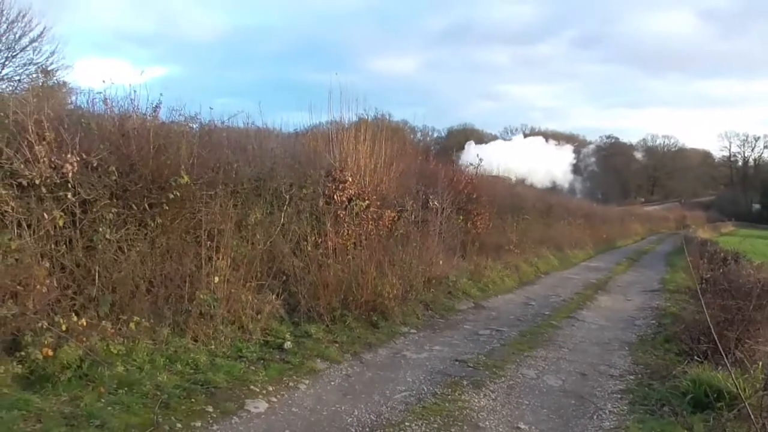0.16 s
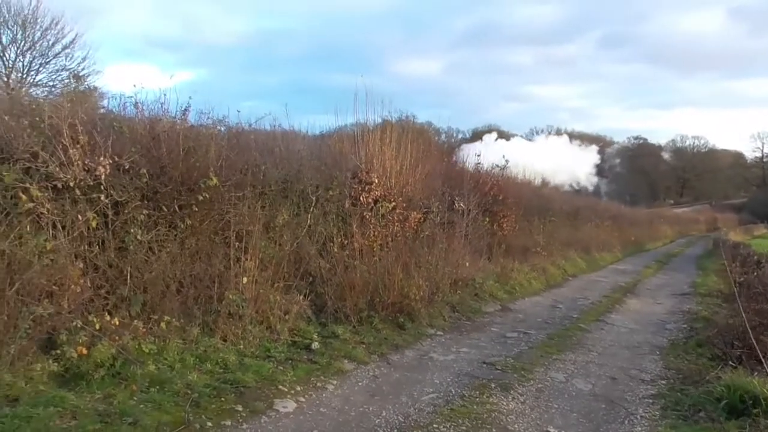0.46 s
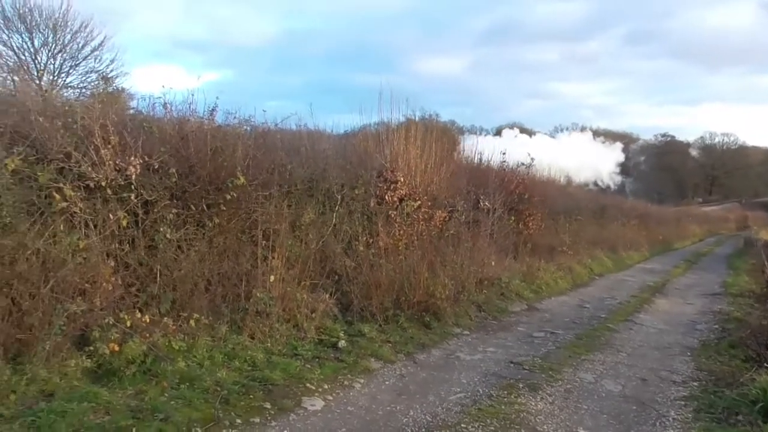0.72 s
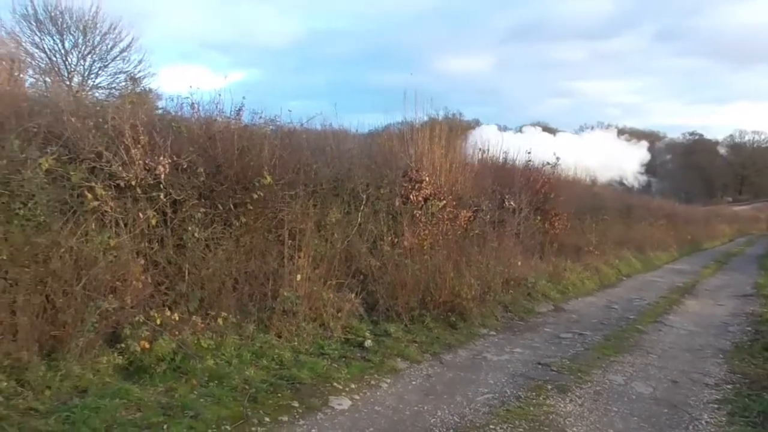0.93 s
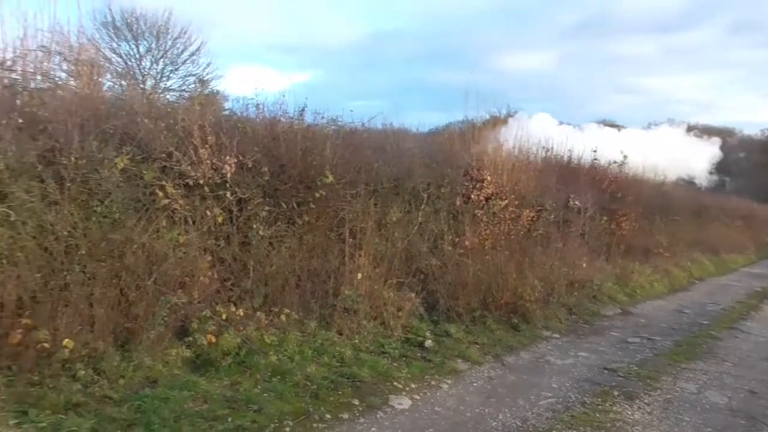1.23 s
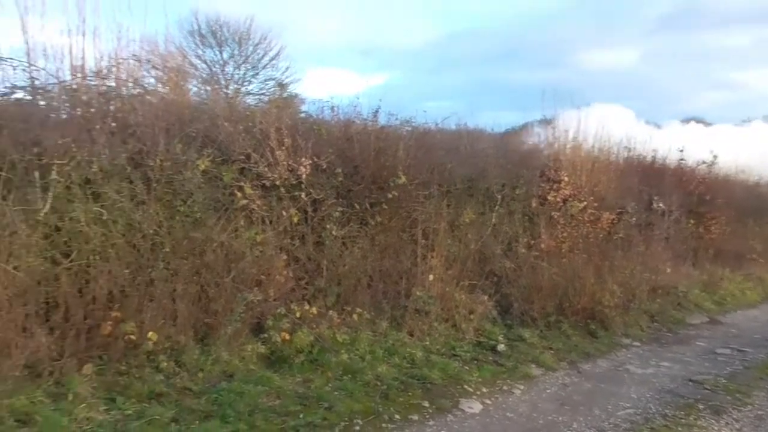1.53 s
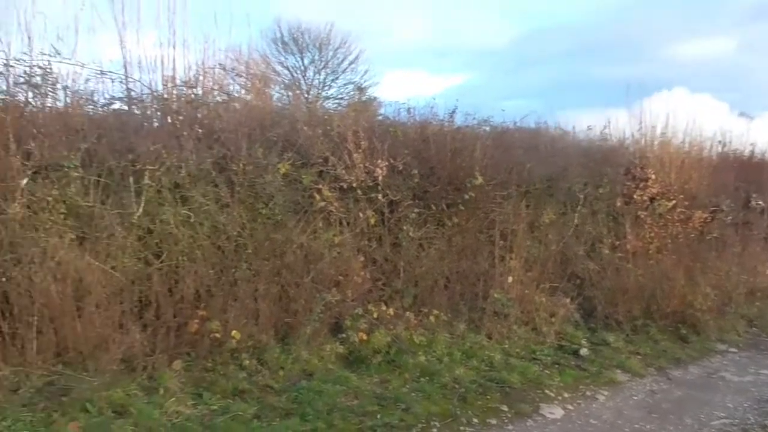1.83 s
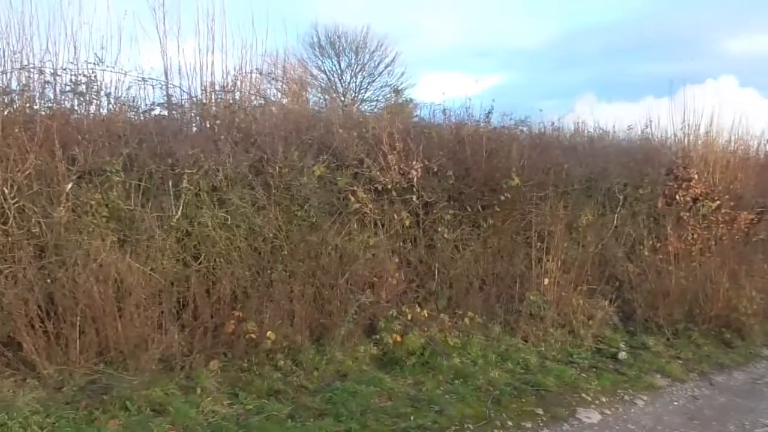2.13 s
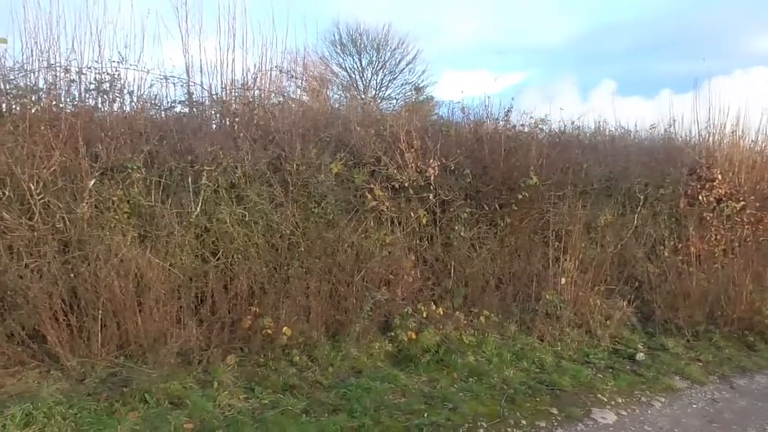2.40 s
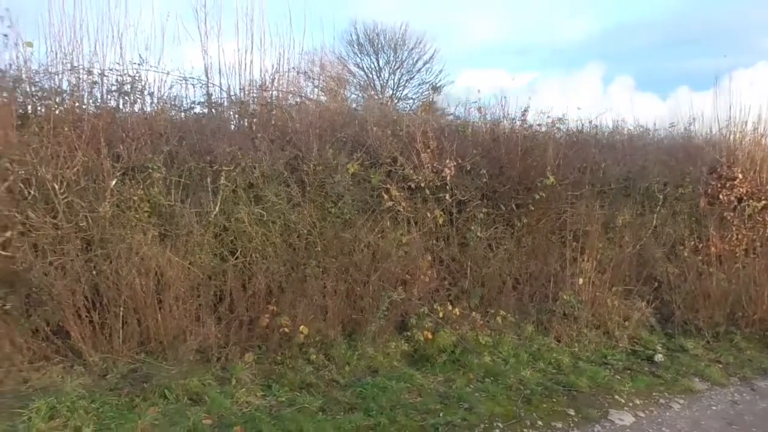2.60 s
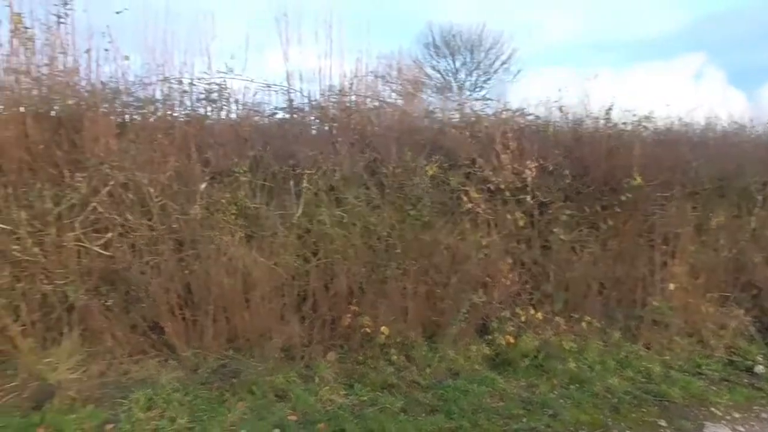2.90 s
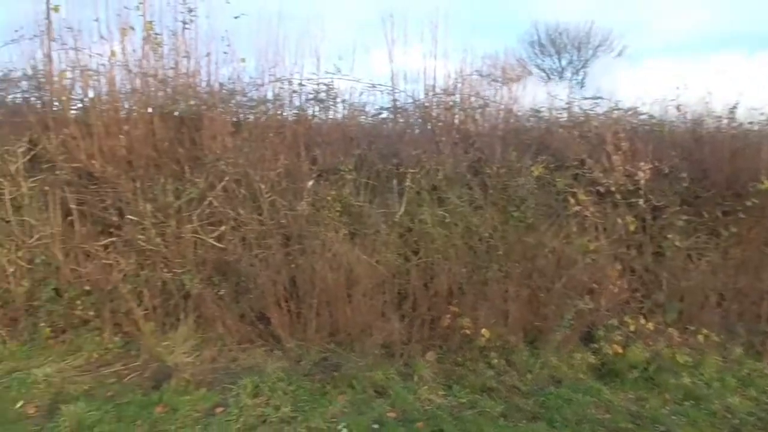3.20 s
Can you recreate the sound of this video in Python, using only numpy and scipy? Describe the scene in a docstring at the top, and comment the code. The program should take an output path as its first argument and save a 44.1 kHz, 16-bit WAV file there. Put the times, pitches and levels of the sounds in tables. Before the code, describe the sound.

A steam train: the loud tail of a high whistle stops with a quick droop, rings briefly, echoes flatter from distant slopes, while chuffing, rumble and hiss swell. Open country lane, handheld stereo microphone beside a hedge.

```python
"""Across a lane, behind a hedge, a steam train runs. Its whistle, a stack of overtones with steam noise,
ends with a droop, rings on nearby and returns flatter from far slopes as smeared tones. Shaped noise makes
the exhaust beats, rolling roar and steam hiss, which swell; struck metal tones make the clatter.
A steam leak sings in the treble, and twigs tick near the microphone as tiny bursts."""
import sys
import numpy as np
from scipy import signal
from scipy.fft import rfft, irfft, next_fast_len
from scipy.io import wavfile
from scipy.ndimage import uniform_filter1d

SR = 44100
rng = np.random.default_rng(int(sys.argv[2]) if len(sys.argv) > 2 else 0)


def int16_out(signal):
    """Quantize to a 16-bit WAV file."""
    q = np.round(np.clip(np.atleast_2d(signal).T, -1, 1) * 32767)
    wavfile.write(sys.argv[1], SR, q.astype(np.int16))


def how_loud(loudness_db):
    """Turn decibels into a plain amplitude multiplier (0 dB gives 1, 20 dB gives 10)."""
    steps = np.asarray(loudness_db, float) / 20
    return 10 ** steps


N = 147735
M = next_fast_len(N)  # a length that transforms quickly
T = np.arange(N) / SR  # time [s]
F = np.arange(M // 2 + 1) * SR / M  # frequency [Hz]
SIDES = np.array([[.5], [-.5]])  # splits a left-minus-right difference between the two channels


def curve(rows, col=1):
    """Draws one column of a table as straight lines over time."""
    return np.interp(T, [r[0] for r in rows], [r[col] for r in rows])


def heard(rows, col):
    """Draws a level column over time [dB], silent outside its rows."""
    outside = (T < rows[0][0]) | (T > rows[-1][0])
    return curve(rows, col) - 200 * outside


def at_hz(rows, hz):
    """Reads a table between its rows, along log frequency as pitch is heard."""
    log_hz = np.log(np.maximum(hz, 1))
    return np.interp(log_hz, np.log([r[0] for r in rows]), [r[1] for r in rows])


def unit(x):
    """Scales a signal to an rms of 1."""
    return x / np.sqrt(np.mean(np.abs(x) ** 2))


def walk(rate):
    """Random levels, each held for 1 / rate seconds and smoothed twice; their rms is 1."""
    hold = int(SR / rate)
    steps = rng.standard_normal(N // 200)[:N // hold + 1]
    held = np.repeat(steps, hold)
    smooth = uniform_filter1d(uniform_filter1d(held, hold), hold)
    return unit(smooth[:N])


def bands(colour, shape_db):
    """Stereo noise in third-octave bands, each with the level in time that shape_db(hz) gives."""
    # share of the right channel's power that follows the left: (frequency [Hz], share [0-1])
    likeness = [(30, .55), (60, 0.97), (130, 1), (290, 0.93), (640, 0.84), (1410, 0.92), (3100, 0.77),
                (6820, 0.46), (15000, 0)]
    # loudness balance: (frequency [Hz], left minus right [dB])
    balance = [(60, .3), (200, 0.3), (380, .4), (700, -1.5), (1290, -1), (2380, -1.5), (4400, -0.8),
               (8120, 2.5), (15000, -5.5)]
    # phase between the channels: (frequency [Hz], how far the left leads [radians])
    lead = [(600, 0.035), (950, 1), (1290, -0.73), (6120, 0.71), (8790, 0.34), (9300, -1.95), (11100, -2.4),
            (12500, -.4), (15000, .01)]
    first, second = rfft(rng.standard_normal((2, M)))
    share = np.clip(at_hz(likeness, F), 0, 1)
    tilt = how_loud(at_hz(balance, F) / 2) * np.exp(.5j * at_hz(lead, F))
    left = first * tilt
    right = (np.sqrt(share) * first + np.sqrt(1 - share) * second) / tilt
    inside = (F > colour[0][0]) & (F < colour[-1][0])
    pair = np.array([left, right]) * how_loud(at_hz(colour, F)) * inside
    scale = np.sqrt(np.mean(irfft(pair, M) ** 2))
    place = 3 * np.log2(np.maximum(F, 1) / 20)  # third-octaves above 20 Hz
    out = 0
    for k in range(30):
        weight = np.clip(1 - abs(place - k), 0, 1)  # neighbouring bands cross-fade
        out = out + irfft(pair * weight, M)[:, :N] * how_loud(shape_db(20 * 2 ** (k / 3)))
    return out / scale


def blur(width_hz):
    """Complex random envelope that smears a tone over a width, as many paths do."""
    n = M // 16 + 1  # drawn at a sixteenth of the sample rate
    z = rng.standard_normal(n) + 1j * rng.standard_normal(n)
    z = np.fft.ifft(z / (1 + (2 * np.fft.fftfreq(n, 16 / SR) / width_hz) ** 2))
    return unit(np.interp(T, np.arange(n) * 16 / SR, z))


def many_paths(hz, db, tones, width_hz, dull_db, steady):
    """Tones heard over many paths: each is smeared, around a steady part, and partly unlike left and right."""
    alike, pan_db = .8, -.6  # pan: left minus right
    phase = 2 * np.pi * np.cumsum(hz) / SR
    out = 0
    for k, tone_db in tones:
        mid = steady + blur(width_hz * np.sqrt(k))
        side = blur(width_hz * np.sqrt(k)) * np.array([[1], [-1]])
        pair = np.sqrt((1 + alike) / 2) * mid + np.sqrt((1 - alike) / 2) * side
        gain = how_loud(tone_db + (k > 1) * dull_db)  # only the overtones grow dull
        out = out + gain * (pair * np.exp(1j * k * phase)).real
    return np.sqrt(2) * out * how_loud(db + pan_db * SIDES)


def whistle():
    """Overtones that each fade alone, over the steam jet's noise; the pitch droops as the valve shuts."""
    # fundamental of the blast: (time [s], pitch [Hz], level [dB])
    blast = [(0, 963, -19), (.028, 963, -14), (.042, 963, -18.5), (.055, 963, -17.5), (.072, 963, -21.5),
             (.09, 963, -14.5), (.105, 963, -17), (.12, 963, -17), (.148, 963, -13.5), (.175, 963, -20.5),
             (.188, 963, -14), (.194, 963, -22.5), (.226, 963, -26), (.234, 963, -19.5), (.25, 963, -16),
             (.26, 963, -18), (.272, 949, -13), (.28, 840, -23), (.29, 790, -30), (.3, 782, -33),
             (.315, 772, -49)]
    # overtones: (multiple of the pitch, then the level at each of overtone_s [dB])
    overtones = [(2, -43, -38, -37, -43, -38, -39), (3, -42, -38, -36, -35, -34, -34),
                 (4, -36, -32, -38, -38, -36, -33), (5, -40, -41, -37, -39, -48, -52),
                 (6, -48, -48, -51, -42, -37, -44), (7, -53, -55, -52, -50, -51, -57),
                 (8, -55, -48, -48, -50, -48, -57), (9, -52, -52, -58, -56, -48, -52),
                 (10, -50, -54, -58, -58, -58, -59), (11, -59, -59, -60, -61, -62, -63)]
    # times of those levels [s]
    overtone_s = (0, .05, .11, .165, .225, .266)
    # steam through the whistle's lip: (frequency [Hz], relative level per Hz [dB])
    jet_colour = [(300, -17), (600, -19), (780, -3), (960, 2), (1100, -5), (1500, -8), (1750, -19.5),
                  (2500, -19), (3600, -12), (4500, -13.5), (5400, -25), (7000, -21.5), (9000, -17.5),
                  (12000, -22), (14200, -35.5), (14700, -50.5)]
    jet_db = -30.5
    shut_s, shut_db_per_s = .266, 1300
    fade_db, fade_per_s = 2.2, 50  # random fading of each overtone
    jitter, jitter_per_s = .002, 88.4  # random pitch change, as a fraction
    pan_db, lead = -.3, .45  # left minus right; radians by which the left leads

    phase = 2 * np.pi * np.cumsum(curve(blast) * (1 + jitter * walk(jitter_per_s))) / SR
    shut_db = -shut_db_per_s * np.maximum(T - shut_s, 0)
    levels = [(1, heard(blast, 2))]
    for k, *db in overtones:
        levels.append((k, np.interp(T, overtone_s, db) + shut_db + fade_db * walk(fade_per_s)))
    # k * k gives every partial its own starting phase
    tone = sum(how_loud(db) * np.sin(k * phase + k * k + lead * SIDES) for k, db in levels)
    jet = bands(jet_colour, lambda hz: jet_db + shut_db + 2.0 * walk(18))
    return np.sqrt(2) * tone * how_loud(pan_db * SIDES) + jet


def nearby_ring():
    """The blast rings on nearby at a fixed pitch, its overtones dying sooner."""
    # ring before its tones are added up: (time [s], level [dB])
    ring_level = [(.26, -53.5), (.29, -31), (.31, -30), (.345, -33), (.39, -42), (.43, -44), (.5, -44),
                  (.6, -44), (.7, -46), (.85, -60)]
    # tones: (multiple of the pitch, relative level [dB])
    tones = [(1, -1.5), (2, -23.5), (3, -13), (4, -17), (5, -26), (6, -29), (7, -36)]
    pitch_hz, width_hz, steady = 963, 22, 1.3
    dull_db = -45 * np.maximum(T - .33, 0)  # 45 dB per second
    return many_paths(pitch_hz + 0 * T, heard(ring_level, 1), tones, width_hz, dull_db, steady)


def far_echo():
    """The blast returns from far slopes, flattened as the train draws away from them."""
    # echo before its tones are added up: (time [s], pitch [Hz], level [dB])
    returns = [(.35, 896, -43), (.47, 890, -39), (.52, 888, -35), (.572, 900, -33), (.6, 897, -38),
               (.7, 895, -31), (.75, 890, -37), (.85, 900, -31.5), (.9, 905, -33), (.96, 912, -28),
               (1.0, 922, -31), (1.06, 930, -26), (1.1, 920, -34), (1.21, 916, -24), (1.28, 918, -32),
               (1.32, 930, -30), (1.4, 925, -33), (1.44, 935, -25), (1.51, 920, -27), (1.54, 930, -32),
               (1.595, 930, -25), (1.66, 922, -30), (1.75, 930, -30), (1.84, 930, -27), (1.875, 925, -36),
               (1.935, 928, -29.5), (2.0, 925, -36), (2.15, 933, -36), (2.3, 950, -55)]
    # tones: (multiple of the pitch, relative level [dB])
    tones = [(1, -2.5), (2, -30), (3, -22), (4, -37)]
    width_hz, steady = 50, 1.4
    brightest_s, dulls_db_per_s = .72, 20
    dull_db = -dulls_db_per_s * abs(T - brightest_s)
    return many_paths(curve(returns), heard(returns, 2), tones, width_hz, dull_db, steady)


def train():
    """Noise whose rumble, roar and hiss swell, beat with the exhaust and flicker band by band."""
    # swell of the three parts: (time [s], rumble [dB], roar [dB], hiss [dB])
    swells = [(0, -17, -4, -35), (.3, -19, -19.5, -8), (.42, -18, -18, -13), (.55, -16, -15.5, -20),
              (.72, -12, -13, -17), (.9, -8.5, -10.5, -13.5), (1.0, -4, -9, -7), (1.1, -7.5, -6.5, -8),
              (1.22, -2, -6, -3), (1.31, 1, 0, -1.5), (1.36, -2.5, -4.5, -9.5), (1.65, -3, -1, -8),
              (1.8, -3, -6.5, -6.5), (1.92, -1.5, -3, -6), (2.1, -0.5, 0, -3), (2.25, -2, -2.5, -7),
              (2.5, -1, 0.5, -1), (2.7, -0.5, 1, -4), (2.9, 1, 1, -0.5), (3.1, -1, 2.5, -1.5),
              (3.18, 0, 2, -0.5), (3.25, -0.5, -0.5, 0.5), (3.31, -2, -1.5, 3.5), (3.35, -3, 2, 3)]
    # frequency where each of those parts rules [Hz]
    part_hz = (250, 1180, 7900)
    # overall colour: (frequency [Hz], relative level per Hz [dB])
    colour = [(13, -68), (22, -34), (64, -16), (97, -8), (172, -1), (239, -3), (274, -9), (381, -20),
              (437, -20.5), (575, -13), (757, -10.5), (822, -6), (996, -15.5), (1240, -18), (1590, -24.5),
              (1770, -32.5), (2030, -26), (2750, -31.5), (3420, -30.5), (3710, -31.5), (4260, -29.5),
              (4900, -34.5), (5400, -39), (5950, -46), (6300, -43), (7200, -41), (11400, -41),
              (13500, -54.5), (15500, -61)]
    # colour gained as the train nears: (frequency [Hz], change [dB per s])
    nearing = [(50, -0.5), (110, 0), (220, -1), (400, 2), (650, -0.5), (900, .5), (1550, 0.5), (2100, -2.5),
               (3000, 1.5), (4800, -1.5), (6600, 1.5), (12000, 1.5)]
    # exhaust beats: (time [s], rise before each band takes its share [dB])
    beats = [(.74, 3.5), (.99, 2), (1.26, 0.5), (1.49, 3.5), (1.73, 5), (2.01, 3.5), (2.281, 4), (2.52, 5),
             (2.759, 5), (3.05, 4), (3.18, 4), (3.3, 4)]
    # how much of a beat each band takes: (frequency [Hz], share of the rise)
    beat_share = [(60, .6), (200, 1.58), (600, 0.48), (3000, 0.16), (10000, 0.076)]
    train_db = -22
    rise_s, fall_s = .027, .087
    gust_db, gust_per_s = 1.3, 24  # full from 8000 Hz up
    surge_db, surge_per_s = .7, 14  # full from 2500 Hz up
    flicker_db, flicker_per_s = 1.28, 9.15

    beat = 0
    for s, db in beats:
        rise = np.exp(-((T - s) / rise_s) ** 2)
        fall = np.exp(-np.abs(T - s) / fall_s)
        beat = beat + db * np.where(T < s, rise, fall)
    parts = [curve(swells, k) for k in (1, 2, 3)]
    surge, gust = walk(surge_per_s), walk(gust_per_s)

    def shape(hz):
        """Level of one band over time [dB], blended from its nearest parts."""
        place = np.interp(np.log(hz), np.log(part_hz), [0, 1, 2])
        level = train_db + sum(max(0, 1 - abs(place - k)) * part for k, part in enumerate(parts))
        level = level + at_hz(nearing, hz) * (T - 2.1)
        level = level + at_hz(beat_share, hz) * beat
        level = level + gust_db * gust * min(hz / 8000, 1)
        level = level + surge_db * surge * min(hz / 2500, 1)
        return level + flicker_db * walk(flicker_per_s)
    return bands(colour, shape)


def wheels():
    """Broad resonances of wheel and rail: two bands of noise, the lower firming up as the wheels come near."""
    # rolling noise: (time [s], upper band level [dB], lower band level [dB])
    rolling = [(.7, -55.5, -55), (1.2, -47.5, -52.5), (1.7, -45, -57), (2.2, -43.5, -48.5), (2.6, -61, -40),
               (2.9, -71, -35.5), (3.35, -55, -33.5)]
    width_hz = 260
    upper = many_paths(2102 + 0 * T, heard(rolling, 1), [(1, 0)], width_hz, 0, 0)
    lower = many_paths(1510 + 0 * T, heard(rolling, 2), [(1, 0)], width_hz, 0, 0)
    return upper + lower


def clatter():
    """Rods and rail joints: random knocks and a few rattling clanks make short metal tones ring."""
    # knocks: (time [s], level [dB])
    knock_level = [(.6, -65), (1.3, -55.5), (2.1, -47), (2.7, -46), (3.0, -47.5), (3.35, -52.5)]
    # loud clanks: (time [s], level before the ringing gain [dB], frequency where they ring most [Hz])
    clanks = [(2.375, -52, 4330), (2.78, -53, 3750), (2.955, -48, 2486), (2.995, -45, 2486),
              (3.09, -50, 2486), (3.13, -46, 3486), (3.185, -47, 4330), (3.2, -48, 4330), (3.31, -48, 4330),
              (3.32, -45, 3185)]
    # ringing tones of the metal [Hz]
    mode_hz = (2098, 2486, 3185, 3486, 3750, 4330, 4600)
    t60_s = .035  # time for a tone to die by 60 dB
    spread_db = 1.6  # how much the knocks differ in strength
    clank_s, clank_db_per_octave = .012, 30  # clank half-width; loss away from its main frequency
    when, size = rng.random(200), rng.exponential(size=200)  # about sixty knocks a second
    half = int(.04 * SR)
    knocks, loud = 0, 0
    for hz in mode_hz:
        hits = np.zeros((2, N))  # row 0: knocks, row 1: clanks
        hits[0, (when * N).astype(int)] = how_loud(spread_db * size) * rng.standard_normal(len(when))
        rattle = rng.standard_normal(N)
        for s, db, centre_hz in clanks:
            near = slice(int(s * SR) - half, int(s * SR) + half)
            gain = how_loud(db - clank_db_per_octave * abs(np.log2(hz / centre_hz)))
            hits[1, near] += gain * np.exp(-((T[near] - s) / clank_s) ** 2) * rattle[near]
        pole = np.exp(2j * np.pi * hz / SR - np.log(1000) / (t60_s * SR))
        softened = uniform_filter1d(hits, size=5)
        rung = signal.lfilter([1], [1, -pole], softened).imag
        knocks = knocks + rung[0]
        loud = loud + rung[1] * np.sqrt(1 - abs(pole) ** 2)
    return unit(knocks) * how_loud(heard(knock_level, 1)) + 4 * loud


def leak():
    """A steam leak sings in the treble: close, wandering bands of noise."""
    # leak: (time [s], level [dB])
    leak_level = [(2.2, -70), (2.5, -56), (2.68, -51), (2.9, -50), (3.05, -45), (3.14, -44), (3.195, -39),
                  (3.24, -46), (3.31, -38), (3.35, -42)]
    width_hz, unlike = 300, .7  # unlike: strength of what differs left and right
    out = 0
    for hz in (11080, 11380, 11680):
        phase = 2 * np.pi * np.cumsum(hz * (1 + .0037 * walk(5))) / SR
        pair = blur(width_hz) + unlike * np.array([blur(width_hz), blur(width_hz)])
        out = out + how_loud(2.3 * walk(7.48)) * (pair * np.exp(1j * phase)).real
    return unit(out) * how_loud(heard(leak_level, 1) - 2.4 * SIDES)  # louder on the right


def low_hiss():
    """A lower, narrow band of hiss: a tone smeared until it is noise."""
    # hiss: (time [s], level [dB])
    hiss_level = [(.9, -72), (1.8, -64), (2.5, -62), (2.85, -57), (3.1, -53), (3.35, -52)]
    return many_paths(6520 + 0 * T, heard(hiss_level, 1), [(1, 0)], 400, 0, 0)


def ticks():
    """Twigs near the microphone: tiny bursts of a high tone, each with a sharp, broad snap."""
    # ticks: (time [s], peak of the burst [dB], frequency [Hz], peak of the snap [dB])
    tick_rows = [(.463, -33.5, 9000, -28), (1.25, -34.5, 12000, -48), (1.44, -38, 10000, -58),
                 (1.504, -38, 10500, -51), (1.654, -31, 9500, -39.5), (1.666, -35, 10000, -45.5),
                 (1.7068, -19, 8300, -31), (1.915, -40, 13000, -47), (1.975, -49, 12000, -47)]
    burst_s, snap_s = .00016, .00003  # half-widths
    out, half = np.zeros(N), int(.003 * SR)
    for s, db, hz, snap_db in tick_rows:
        near = slice(int(s * SR) - half, int(s * SR) + half)
        t = T[near] - s
        burst = np.exp(-(t / burst_s) ** 2) * np.cos(2 * np.pi * hz * t)
        snap = (1 - 2 * (t / snap_s) ** 2) * np.exp(-(t / snap_s) ** 2)
        out[near] += how_loud(db) * burst + how_loud(snap_db) * snap
    return out


def scene():
    """Adds up all the sources, as sounds in air do."""
    blast = whistle() + nearby_ring() + far_echo()
    passing = train() + wheels() + clatter()
    return blast + passing + leak() + low_hiss() + ticks()


def roll_off(x):
    """The treble ends steeply here."""
    return signal.sosfilt(signal.butter(12, 15610, fs=SR, output="sos"), x)


def record(dry):
    """Hands on the finished mix."""
    return roll_off(dry)


dry = scene()
out = record(dry)
int16_out(out)
```